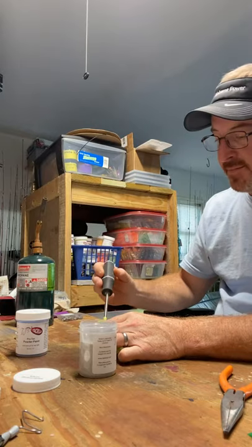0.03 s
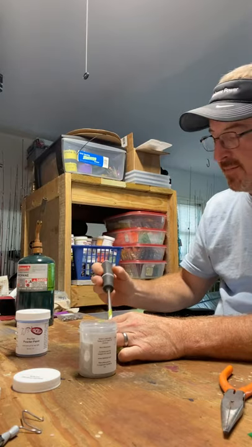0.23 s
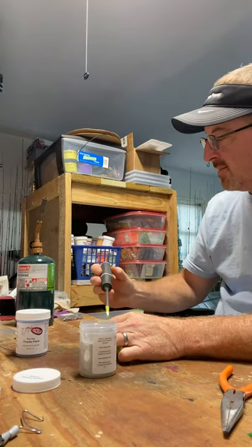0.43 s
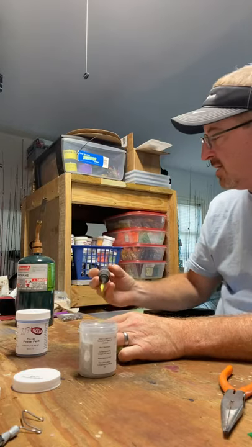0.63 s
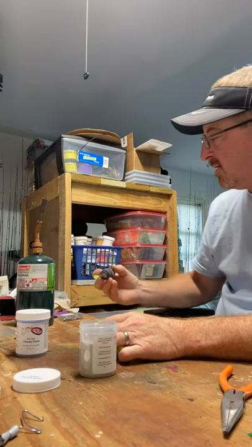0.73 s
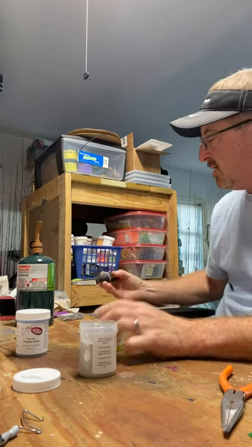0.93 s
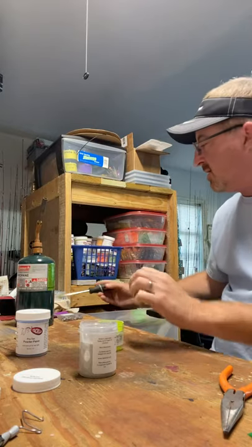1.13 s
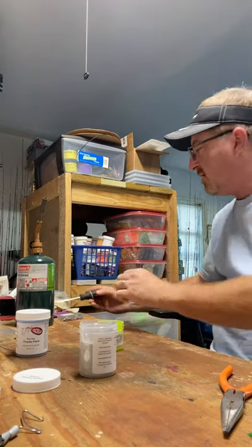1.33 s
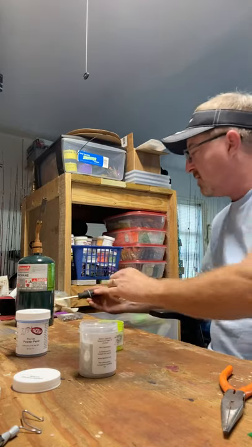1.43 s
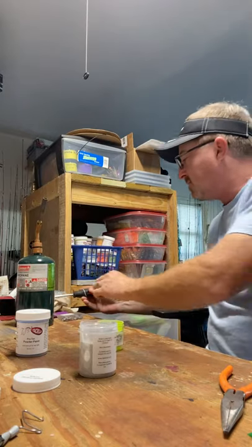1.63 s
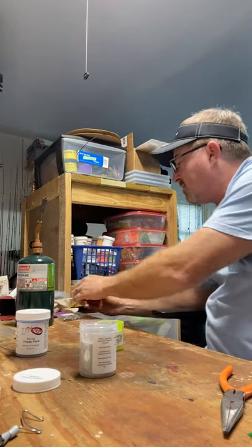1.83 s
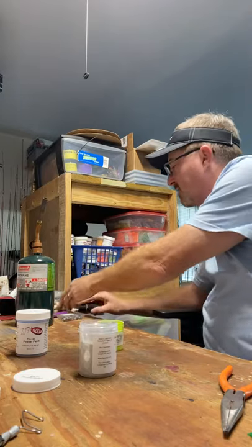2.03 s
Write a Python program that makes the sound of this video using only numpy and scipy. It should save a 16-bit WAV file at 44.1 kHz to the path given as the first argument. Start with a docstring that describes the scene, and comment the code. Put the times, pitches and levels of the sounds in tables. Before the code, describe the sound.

A screwdriver raps three times inside a plastic jar, then tools clatter and scrape on a bench

```python
"""Three sharp, hollow raps over a low machine hum: a screwdriver strikes inside a plastic jar to shake off powder.
Noise cracks ring damped wall modes; low modes and a falling sine thump the wooden bench under the jar.
Then a clatter of filtered noise bursts as it is laid down, and random slips as things are scraped along
the back of the bench; coloured noise gives the sliding cloth and the small workshop's air.
Two close microphones stand on the bench: level and phase differences, plus a noise-built room answer."""
import sys
import numpy as np
from scipy import signal
from scipy.fft import rfft, irfft, next_fast_len
from scipy.io import wavfile
from scipy.ndimage import map_coordinates

SR = 44100
rng = np.random.default_rng(int(sys.argv[2]) if len(sys.argv) > 2 else 0)


def wrap_up_sound(samples):
    """Save the sound to the file named by the first command line argument, as 16-bit audio."""
    columns = np.atleast_2d(samples).T
    # keep every value between -1 and 1, then stretch to whole-number steps
    tamed = np.clip(columns, -1, 1)
    steps = np.round(tamed * 32767).astype(np.int16)
    wavfile.write(sys.argv[1], SR, steps)


N = 91507
TIME = np.arange(N) / SR
RING = np.arange(int(0.7 * SR)) / SR  # time axis of one decaying sound, s

# raps in the jar: start_s, level_db, favoured_hz (by the contact point), favour_db, lead_db (swell before it)
RAPS = [(0.0239, 0.5, 2850, 22, -23), (0.1641, 0.5, 2760, 19, -23.5), (0.3154, 2.5, 2260, 9, -16.5)]
# near sources, left over right: freq_hz, balance_db
NEAR_BALANCE = [(70, -1.5), (160, 6.5), (250, 7), (325, 13), (385, -5.5), (520, 0.5), (1800, 2),
                (6000, 0.1)]
# near sources, left ahead of right: freq_hz, lead_rad
NEAR_PHASE = [(160, .1), (320, 1), (400, -2), (520, -2.09), (1150, -2.1), (1850, -1.32), (3000, -1.3),
              (4200, -1.2), (8000, -1.76)]


def amp(db):
    """Decibels to gain."""
    return 10 ** (np.asarray(db) / 20)


def unit(x):
    """Scale to rms 1."""
    return x / np.sqrt(np.mean(x ** 2) + 1e-20)


def along(points, hz):
    """(Hz, value) points interpolated on a log-frequency axis."""
    f, v = np.transpose(points)
    return np.interp(np.log(hz + 1), np.log(f + 1), v)


def level(points):
    """Gain per sample from (s, dB) points."""
    return amp(np.interp(TIME, *np.transpose(points)))


def fade(t, t60):
    """Exponential decay, 60 dB in t60 seconds."""
    return amp(-60 * t / t60)


def filtered(x, response):
    """Multiply the zero-padded spectrum of x by response(hz)."""
    n = x.shape[-1]
    m = next_fast_len(n + 8192)
    return irfft(rfft(x, m) * response(np.fft.rfftfreq(m, 1 / SR)), m)[..., :n]


def noise(colour, shape):
    """White noise shaped by (Hz, dB) points, then scaled to rms 1."""
    white = rng.standard_normal(shape)
    return unit(filtered(white, lambda hz: amp(along(colour, hz))))


def bump(hz, centre_hz, octaves):
    """Bell on the log-frequency axis; octaves = half width at 1/e."""
    return np.exp(-(np.log2((hz + 1) / centre_hz) / octaves) ** 2)


def waver(rate):
    """Smooth random curve, rate knots per second."""
    knots = rng.standard_normal(int(N * rate / SR) + 4)
    return map_coordinates(knots, [TIME * rate])


def ring(modes, rise_s):
    """Sum of damped (Hz, dB, t60 s) modes that build up together."""
    total = sum(amp(db) * np.sin(2 * np.pi * hz * RING) * fade(RING, t60) for hz, db, t60 in modes)
    return total * (1 - np.exp(-RING / rise_s))


def add(track, s, sound):
    """Mix a sound into a track at s seconds."""
    i = max(round(s * SR), 0)
    track[i:i + len(sound)] += sound[:N - i]


def room(x):
    """The workshop's answer: dense early reflections plus a tail that decays by band."""
    # tail decay: freq_hz, t60_s
    tail_t60 = [(150, 0.22), (500, 0.32), (1800, 0.41), (3500, 0.3), (7000, .38), (12000, 0.13)]
    # reflected spectrum: freq_hz, gain_db
    tail_colour = [(100, -9.5), (250, 1), (500, -1.5), (750, 2), (1100, -6.5), (2000, -4), (3000, -3),
                   (4800, -3.5), (6100, -1), (7500, -10), (10000, 4), (12500, -11.5)]
    delay_s, early_db, early_t60_s = 0.006, -1, 0.032
    hz, t, z = signal.stft(rng.standard_normal((2, len(RING))), SR, nperseg=256)
    late_decay = fade(t, along(tail_t60, hz)[:, None])
    early_decay = amp(early_db) * fade(t, early_t60_s)
    tail = signal.istft(z * (late_decay + early_decay), SR, nperseg=256)[1]
    tail = filtered(tail / np.linalg.norm(tail[0]), lambda f: amp(along(tail_colour, f)))
    # lows stay common to both channels, highs decorrelate
    turn = lambda f: np.pi / 4 * f / (f + 500)
    mid, side = filtered(tail, lambda f: np.array([np.cos(turn(f)), np.sin(turn(f))]))
    delayed = np.pad(x, (round(delay_s * SR), 0))
    return signal.fftconvolve(delayed[None], np.array([mid + side, mid - side]), axes=1)[:, :N]


def ports(x, balance, phase):
    """Level and phase differences between two microphones, split evenly about the source."""
    half = np.array([[0.5], [-0.5]])
    return filtered(x, lambda hz: amp(half * along(balance, hz)) * np.exp(1j * half * along(phase, hz)))


def background():
    """Machine hum: sines wavering in level and phase, over partly decorrelated room noise."""
    # machine hum before wavering: freq_hz, rms_db
    hum_lines = [(59, -57.5), (75.4, -55.5), (118.6, -60)]
    # room noise spectrum: freq_hz, gain_db
    air_colour = [(20, -40), (45, -1.5), (70, -8), (125, -2), (160, -12), (250, -18.5), (500, -22.5),
                  (750, -25), (1050, -35), (1700, -30.5), (3200, -36.5), (4500, -58.5), (10000, -49.5),
                  (12000, -66.5)]
    hum_waver_db, air_db = 4, -56
    hum = 0
    for hz, db in hum_lines:
        gain = amp(db + hum_waver_db * waver(2.68)) * np.sqrt(2)
        hum = hum + gain * np.sin(2 * np.pi * hz * TIME + 0.39 * waver(1.9))
    apart = filtered(noise(air_colour, N), lambda f: f / (f + 500))
    air = noise(air_colour, N) + apart * np.array([[1], [-1]])
    return hum + amp(air_db) * air


def sleeve():
    """Cloth slides softly as the arm moves: coloured noise under a level curve."""
    # sliding level: time_s, level_db
    slide_level = [(.6, -79.5), (.83, -84), (.88, -65), (.97, -60.5), (1.03, -74), (1.12, -82.5),
                   (1.8, -63.5), (1.95, -62), (2.07, -65.5)]
    # cloth spectrum: freq_hz, gain_db
    cloth_colour = [(400, -18.5), (1300, -2.5), (1800, 1), (2600, -2.5), (3400, -2), (4300, -6),
                    (5800, -12), (6700, -8), (7800, -11), (9500, -11.5), (12000, -27.5)]
    return level(slide_level) * noise(cloth_colour, N)


def scrape():
    """Clumps of tiny slips rasp on the wood and excite the dragged object's resonances."""
    # scraping pressure: time_s, level_db
    pressure = [(1.32, -70.5), (1.37, -52.5), (1.43, -39.5), (1.47, -82), (1.54, -41), (1.6, -45),
                (1.635, -45), (1.655, -34), (1.695, -27.5), (1.735, -35.5), (1.77, -42.5), (1.81, -57),
                (1.87, -84.5), (1.93, -57.5), (2.07, -93)]
    # resonances of the dragged object: centre_hz, width_hz, gain_db
    resonances = [(870, 240, 2), (1266, 140, 6.5), (1630, 99, -3), (1800, 87, -9.5), (2790, 120, -15),
                  (2750, 43, 17), (3400, 150, -34.5)]
    # rasp spectrum: freq_hz, gain_db
    rasp_colour = [(150, -26), (500, -7.5), (900, -1), (1400, 9), (2200, -5.5), (3000, 0.5), (4200, -8.5),
                   (5000, -18.5), (6000, -7.5), (7500, -15), (10000, -26), (11800, -54)]
    grains_per_s, ring_db, rasp_db = 3000, -11, -3.5
    clumps_per_s, clump_db = 220, 2.2
    slips = rng.standard_normal(N) * (rng.random(N) < grains_per_s / SR)
    slips = slips + 0.12 * rng.standard_normal(N)  # fine hiss between grains
    slips = slips * amp(clump_db * waver(clumps_per_s))

    def body(f):
        """Band-pass resonances of alternating sign."""
        total = 0
        for k, (centre, width, db) in enumerate(resonances):
            damping = 1j * f * width
            total = total + (-1) ** k * amp(db) * damping / (centre * centre - f * f + damping)
        return total

    ringing = unit(filtered(slips, body))
    rasp = unit(filtered(slips, lambda f: amp(along(rasp_colour, f))))
    return level(pressure) * (amp(ring_db) * ringing + amp(rasp_db) * rasp)


def knocks():
    """Contacts of tools with each other and the wood: band-weighted decaying noise bursts."""
    # tool contacts: start_s, level_db, centre_hz, width_octaves, t60_s
    contacts = [(0.576, -48.5, 739, 1.4, 0.036), (0.631, -54.5, 7500, 0.5, 0.033),
                (0.705, -52, 590, .7, 0.055), (0.737, -46, 810, 1.73, 0.039),
                (0.765, -46.5, 1090, 1.4, 0.02), (1.068, -56, 7180, 0.753, 0.039),
                (1.332, -35.5, 1070, 0.42, 0.055), (1.334, -40.5, 300, 1.6, .04),
                (1.385, -43, 987, 0.41, 0.26), (1.411, -30.5, 1540, 0.92, 0.039),
                (1.411, -44.5, 6940, .6, 0.092), (1.566, -46, 6450, 0.52, .1),
                (1.437, -29, 1420, 2.3, 0.24), (1.44, -37, 175, 0.41, .16), (1.445, -32, 510, 0.4, 0.13),
                (1.463, -38, 2050, 1.9, 0.48), (1.495, -35.5, 830, 0.19, .04), (1.518, -40, 851, .25, .04),
                (1.559, -40, 2480, 2.15, 0.12), (1.568, -34.5, 880, 0.39, 0.047),
                (1.573, -31, 1850, 1.06, 0.047), (1.614, -37.5, 2995, 0.13, 0.12),
                (1.648, -41, 1330, .45, .06), (1.688, -32.5, 1400, 0.32, 0.041),
                (1.727, -41, 1580, .8, 0.028), (1.915, -51.5, 2830, 0.16, 0.094),
                (1.921, -57, 1200, 0.75, .08), (1.986, -52.5, 1370, 0.26, .04)]
    # tool spectrum: freq_hz, gain_db
    tool_colour = [(50, -4), (170, 26), (1000, 5.5), (3000, 7), (4200, 3.5), (5000, -8.5), (6200, -6.5),
                   (9000, -16), (11000, -17), (13000, -25)]
    rise_s, broad_db = 0.0023, -24.5  # broad_db: wideband share
    out = np.zeros(N)
    for s, db, hz, octaves, t60 in contacts:
        envelope = fade(RING, t60) * (1 - np.exp(-RING / rise_s))
        band = lambda f: bump(f, hz, octaves) + amp(broad_db)
        burst = envelope * filtered(noise(tool_colour, len(RING)), band)
        add(out, s, amp(db) * burst * np.linalg.norm(envelope) / np.linalg.norm(burst))
    return out


def thud():
    """The bench's main swing: a sine that glides down, holds, and is then damped."""
    start_hz, end_hz, glide_s = 582, 162.85, 0.0027
    level_db, rise_s, t60_s, hold_s = -12.5, 0.0016, 0.17, 0.057
    hz = end_hz + (start_hz - end_hz) * np.exp(-RING / glide_s)
    envelope = (1 - np.exp(-RING / rise_s)) * fade(RING, t60_s) / (1 + (RING / hold_s) ** 12)
    return amp(level_db) * envelope * np.sin(2 * np.pi * np.cumsum(hz) / SR)


def bench():
    """Every rap rings the jar's base and pushes the bench top down; the arm adds soft bumps."""
    # low modes of the jar's base: freq_hz, level_db, t60_s
    base_modes = [(257.6, -4, 0.04), (336.6, -29, 0.32), (380, -2.5, 0.051), (479, -34, 0.22)]
    # low modes of the bench top: freq_hz, level_db, t60_s
    top_modes = [(81, -31.5, 0.35), (223, -7.5, 0.085)]
    # arm shifting on the bench: centre_s, level_db, pitch_hz, half_length_s
    nudges = [(0.648, -43.5, 256, 0.0075), (.652, -46.5, 164, 0.009), (.694, -45, 126.5, 0.02),
              (0.718, -50.5, 279, 0.008)]
    rumble_colour = [(90, -25), (170, 0.5), (270, -3.5), (450, -10), (900, -17), (1800, -48)]  # (Hz, dB)
    delay_s, rise_s, swing_db = 0.0031, 0.014, 1
    rumble_db, rumble_t60_s = -31.5, 0.37
    radiation_hz = 54.7  # the top hardly radiates below this
    out = np.zeros(N)
    swing = ring(base_modes, rise_s) - ring(top_modes, rise_s) - thud()
    for s, db, *_ in RAPS:
        rumble = noise(rumble_colour, len(RING)) * fade(RING, rumble_t60_s)
        add(out, s + delay_s, amp(swing_db) * swing + amp(db + rumble_db) * rumble)
    for s, db, hz, half_s in nudges:
        swell = np.exp(-((TIME - s) / half_s) ** 2)
        out = out + amp(db) * swell * np.sin(2 * np.pi * hz * (TIME - s))
    return filtered(out, lambda f: 1 - 1 / (1 + (f / radiation_hz) ** 4))


def crack():
    """The noisy instant of contact: a short burst of coloured noise."""
    colour = [(500, 4), (2200, 5.5), (3500, -10.5), (6000, -9), (10000, -17), (13000, -21)]  # (Hz, dB)
    return noise(colour, len(RING)) * fade(RING, 0.024)


def jar(s, db, favoured_hz, favour_db, lead_db):
    """One rap: a short swell leads into the crack of the shaft, which rings the wall; the room answers."""
    # jar wall modes before the contact point's emphasis: freq_hz, level_db, t60_s
    wall_modes = [(620, -19, 0.023), (737, -18.5, 0.022), (833, -25, 0.028), (981, -21.5, 0.04),
                  (1188, -11, 0.024), (1441, -16, 0.028), (1724, -19.5, 0.029), (1850, -4, 0.016),
                  (2348, -16, 0.013), (2534, -21.5, 0.012), (2915, -21.5, 0.009), (3050, -35, 0.017),
                  (4463, -19, 0.013), (4740, -30.5, 0.0093), (5530, -31, 0.027), (6300, -27, 0.025),
                  (7730, -29, 0.025), (10460, -37, 0.013)]
    lead_colour = [(400, -23.0), (1200, -1), (2100, 1), (2800, -13), (3600, -18), (4600, -17),
                   (12000, -55.5)]  # (Hz, dB)
    shaft_hz, shaft_db, shaft_t60_s = 1622, -51, 0.97  # the steel rings on faintly
    attack_s, lead_rise_s, favour_octaves = 0.0003, 0.036, 0.22
    crack_db, crack_favour = -17.5, 0.64  # crack_favour: share of the emphasis that colours the crack
    wet_db, wall_spread_db, crack_spread_db = -9, -3, -16
    out, spray = np.zeros(N), np.zeros(N)
    emphasis_db = lambda hz: favour_db * bump(hz, favoured_hz, favour_octaves)
    tint = lambda x: filtered(x, lambda hz: amp(crack_favour * emphasis_db(hz)))
    wall = ring([(hz, g + emphasis_db(hz), t60) for hz, g, t60 in wall_modes], attack_s)
    steel = ring([(shaft_hz, shaft_db, shaft_t60_s)], attack_s)
    add(out, s, amp(db) * (wall + amp(crack_db) * tint(crack()) + steel))
    add(spray, s, amp(db + crack_spread_db) * crack())  # bright part heard only through the room
    lead = unit(tint(noise(lead_colour, N)))
    out = out + amp(lead_db) * lead * fade(np.abs(s - TIME), lead_rise_s) * (TIME < s)
    wet = amp(wall_spread_db) * room(out) + room(spray)
    return ports(out, NEAR_BALANCE, NEAR_PHASE) + amp(wet_db) * wet


def scene():
    """Jar and bench close to the microphones, tools farther back in the room, over the background."""
    # far sources, left over right: freq_hz, balance_db
    far_balance = [(60, 1.5), (170, 1.5), (400, 5.5), (900, 6.5), (1400, 2.5), (2400, 0.5), (8000, 0.35)]
    # far sources, left ahead of right: freq_hz, lead_rad
    far_phase = [(200, -2.2), (650, -1.2), (1300, -0.82), (2500, -1.5), (8000, -1.2)]
    thump_wet_db, knock_wet_db, rub_wet_db = -13, -6, -3.5
    thump, hits, rubs = bench(), knocks(), scrape() + sleeve()
    near = sum(jar(*row) for row in RAPS)
    near = near + ports(thump, NEAR_BALANCE, NEAR_PHASE) + amp(thump_wet_db) * room(thump)
    far = hits + rubs + room(amp(knock_wet_db) * hits + amp(rub_wet_db) * rubs)
    return near + ports(far, far_balance, far_phase) + background()


def record(dry):
    """The recorder rounds off the highest peaks and cuts steeply above its band limit."""
    ceiling, top_hz = 0.95, 13400
    rounded = dry / (1 + np.abs(dry / ceiling) ** 8) ** (1 / 8)
    return filtered(rounded, lambda hz: 1 / (1 + (hz / top_hz) ** 60))


dry = scene()
out = record(dry)
wrap_up_sound(out)
```